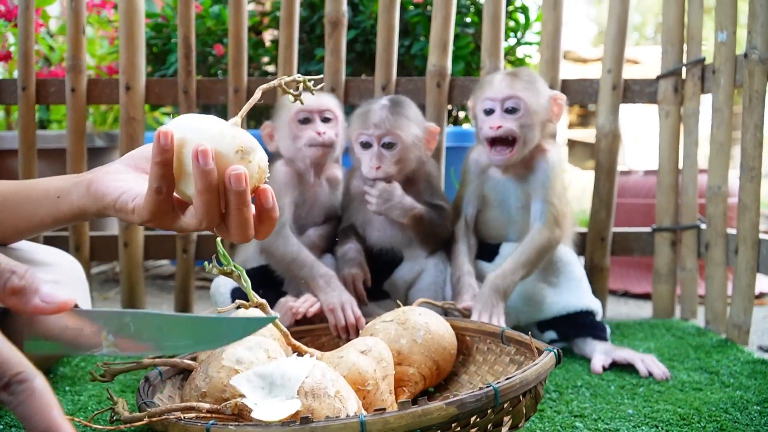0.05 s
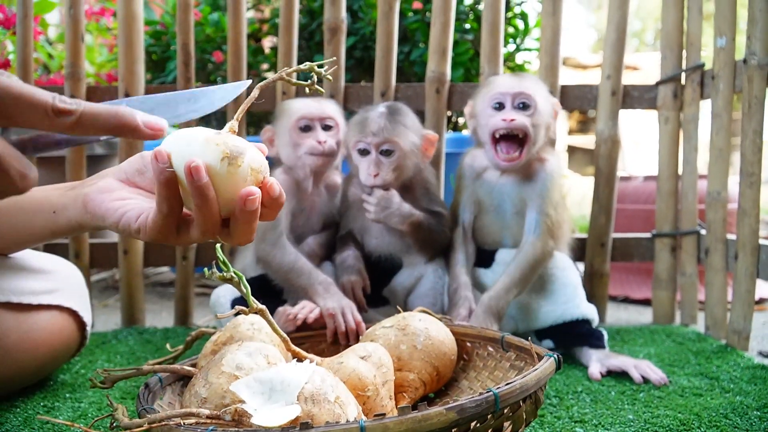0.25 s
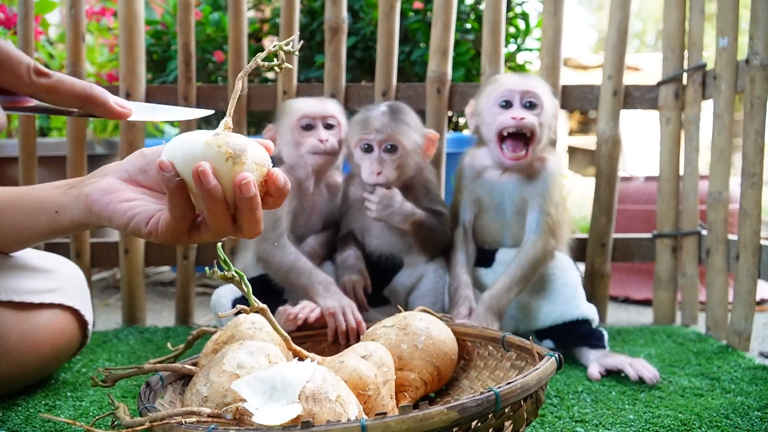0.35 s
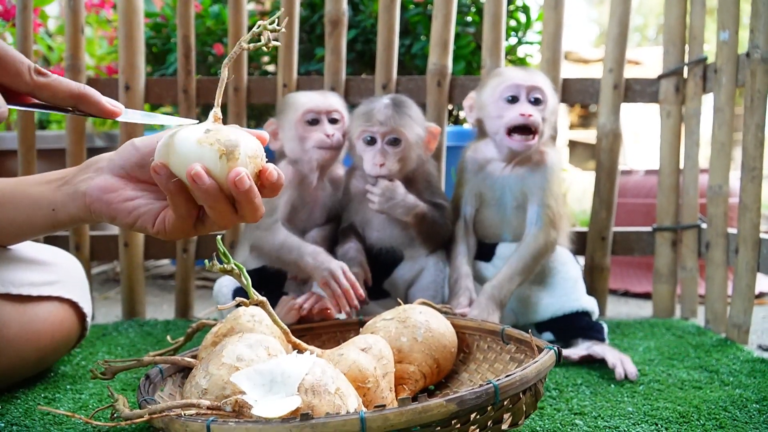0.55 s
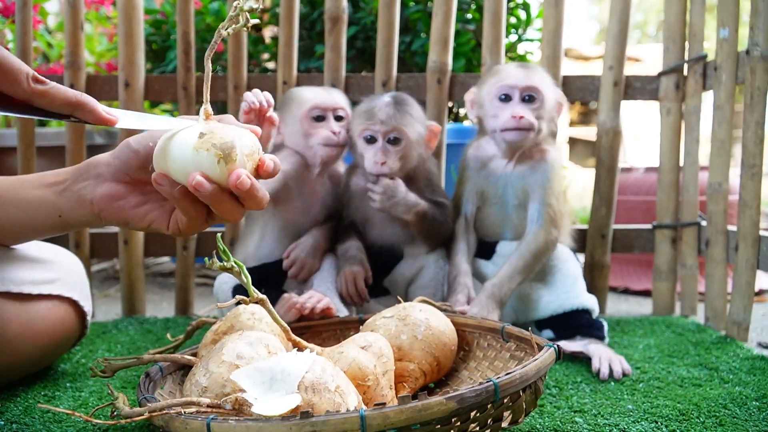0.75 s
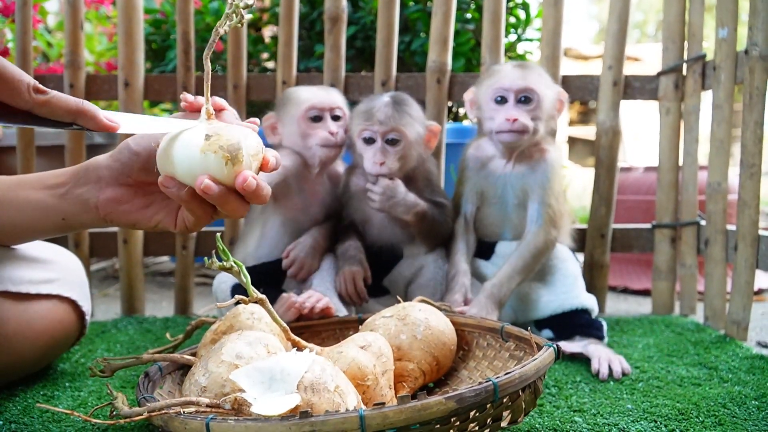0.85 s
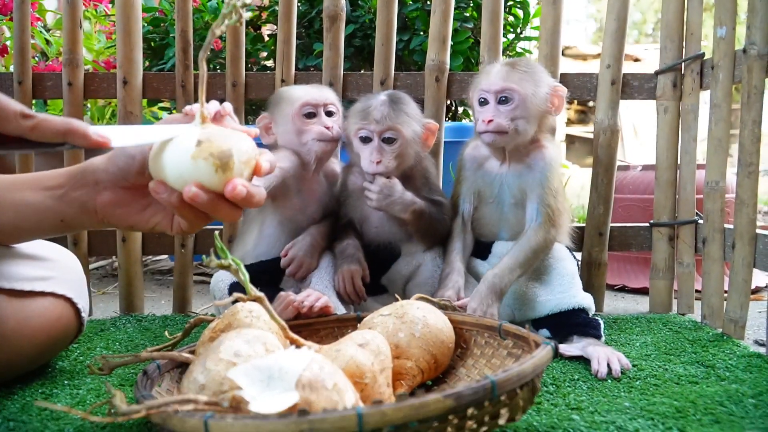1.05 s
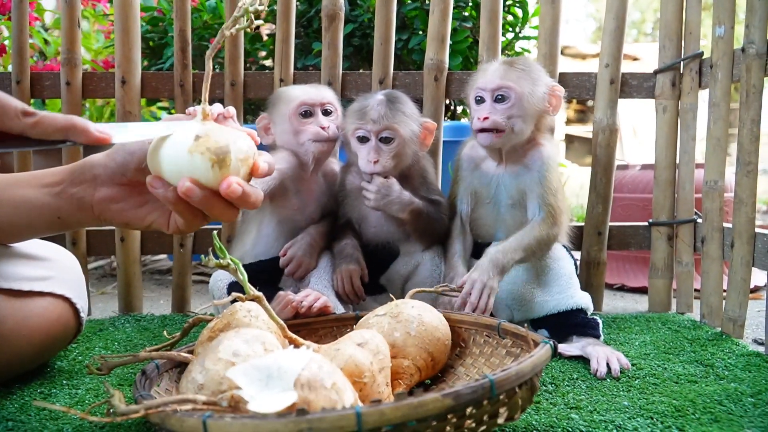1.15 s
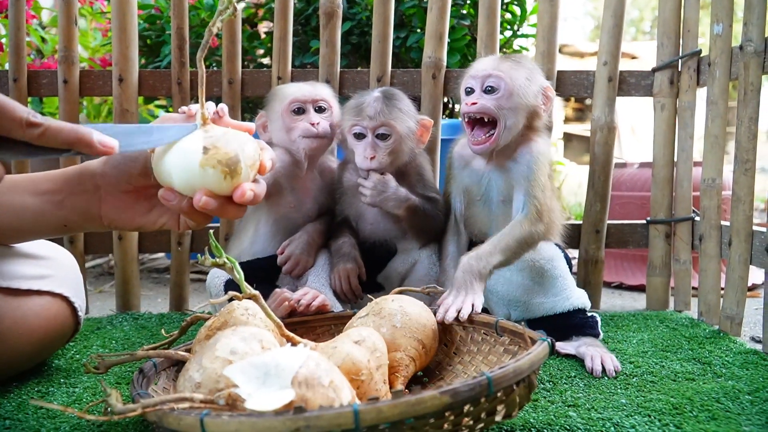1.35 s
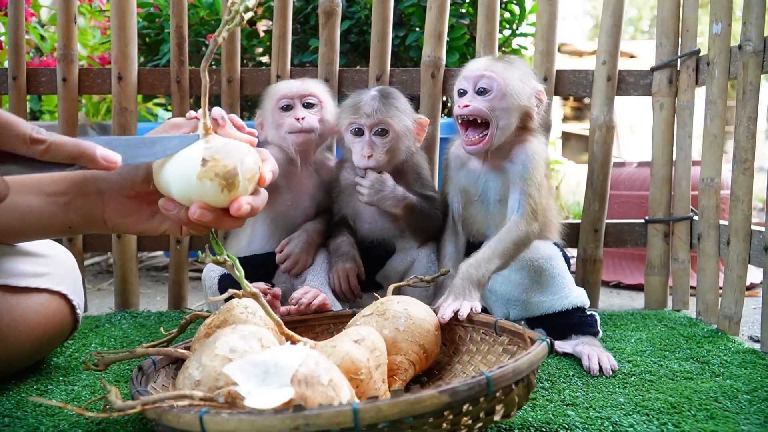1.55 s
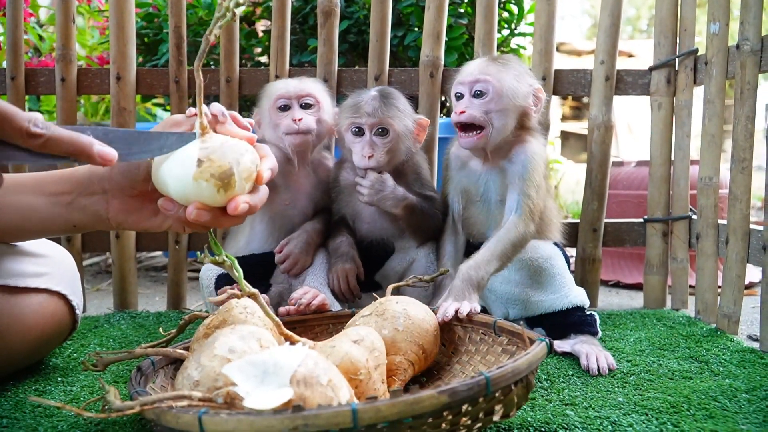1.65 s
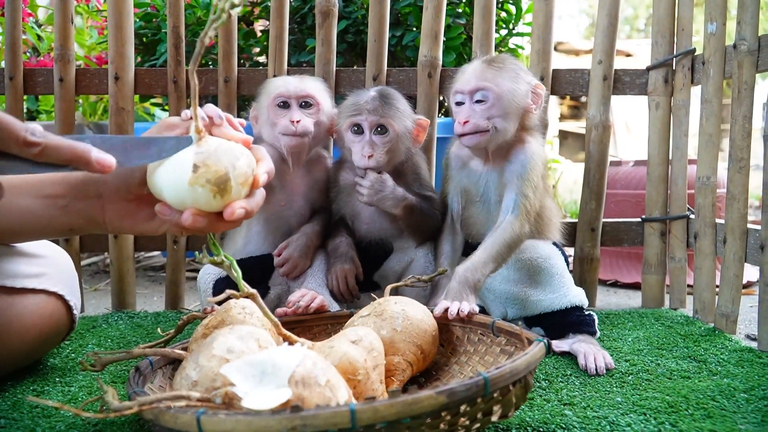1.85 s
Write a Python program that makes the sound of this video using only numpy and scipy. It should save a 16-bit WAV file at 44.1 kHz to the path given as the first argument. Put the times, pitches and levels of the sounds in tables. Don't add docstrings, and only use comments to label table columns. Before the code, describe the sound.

A young monkey squeals twice outdoors. The tail of an earlier squawk dies away at 0 s. From 0.15 s a thin whistle climbs very high, flutters, slides down and breaks into a rough squawk and low gulp by 0.6 s. A knife scrapes faintly near 0.9 s and ticks at 1.2 s. A second squeal runs 1.3-1.65 s, echoing briefly over soft yard hum.

```python
import sys
import numpy as np
from scipy import signal
from scipy.fft import rfft, irfft
from scipy.io import wavfile
from scipy.ndimage import uniform_filter1d

SR = 44100
rng = np.random.default_rng(int(sys.argv[2]) if len(sys.argv) > 2 else 0)


def transcribe(signal):
    frames = np.atleast_2d(signal).T
    limited = np.clip(frames, -1, 1)
    pcm = np.round(limited * 32767).astype(np.int16)
    wavfile.write(sys.argv[1], SR, pcm)


def volts_from_db(level):
    exponent = np.asarray(level, float) / 20
    return 10 ** exponent


N = 83790
T = np.arange(N) / SR

# f/Hz, density/dB per Hz
YARD_SPECTRUM = [(15, -14), (40, -5.5), (228, -5), (420, -3), (700, -14), (1050, -11.5), (1600, -14.5),
                 (2330, -21), (2560, -15), (11000, -38), (14300, -48), (22000, -52.5)]
# f/Hz, level/dB, t60/s
ECHO_BANDS = [(1220, -47.5, 0.093), (2023, -35.5, 0.54), (2789, -30.5, 0.31), (3700, -31, 0.47),
              (4818, -29, 0.45), (6198, -28.5, 0.43), (7800, -34.5, 0.42), (10000, -43, 0.16),
              (12500, -58, .16)]
# t/s, length/s, level/dB
WIND_PUFFS = [
    (0.21, 0.1, -53),
    (0.417, 0.018, -50.5),
    (1.552, 0.035, -51.5),
]
# t/s, peak level/dB
KNIFE_TICKS = [
    (0.9014, -57),
    (1.2049, -41.5),
    (1.2665, -36),
]
# t/s, length/s, level/dB
KNIFE_STROKES = [
    (0.852, 0.21, -62),
    (1.256, 0.13, -66.5),
]
# f/Hz, peak level/dB, fade/s
REMNANT_PARTIALS = [(1350, -27, 0.012), (2040, -21, .0045), (2750, -25.5, 0.007), (3510, -25, .0045),
                    (4100, -27, .0045)]
# t/s, length/s, f/Hz, level/dB
PEEP_TONES = [
    (1.302, 0.014, 5790, -59.5),
]
# t/s, length/s, f/Hz, level/dB
MOUTH_HUMS = [
    (.25, .04, 400, -54),
    (.35, .1, 290, -57),
    (1.395, .04, 420, -55),
]
# t/s, length/s, f/Hz, level/dB
GULP_TONES = [
    (0.571, 0.031, 249, -25),
    (1.643, 0.018, 265, -26.5),
]
# t/s, f/Hz, level/dB
STRAND_LINE = [(1.53, 4535, -46), (1.542, 4350, -35), (1.558, 4120, -35), (1.572, 3860, -30.5),
               (1.58, 3800, -49)]
# t/s, level/dB
SQUAWK_RASPS = [
    [(0.0, -42), (0.004, -35), (0.012, -59.5), (0.03, -53)],
    [(0.502, -45), (0.506, -20.5), (0.514, -23), (0.518, -12.5), (0.532, -12.5), (0.542, -10.5),
     (0.561, -16), (0.57, -24.5), (0.578, -57.5)],
    [(1.615, -28), (1.619, -19.5), (1.627, -13.5), (1.631, -16), (1.6325, -28), (1.634, -4.5),
     (1.6355, -23), (1.637, -15), (1.643, -34)],
]
# t/s, f/Hz, level/dB
SQUAWK_THROATS = [
    [(0.0, 1370, -45), (0.012, 1350, -80)],
    [(0.523, 1914, -23.5), (0.531, 1729, -15), (0.539, 1571, -23.5), (0.541, 1750, -33.5),
     (0.544, 1788, -18), (0.547, 1754, -21.5), (0.553, 1707, -18.5), (0.563, 1480, -32),
     (0.571, 1350, -29.5)],
    [(1.615, 1900, -28.5), (1.617, 1837, -19.5), (1.622, 1604, -16), (1.623, 1778, -52),
     (1.627, 1767, -23.5), (1.633, 1668, -27.5), (1.638, 1597, -32), (1.642, 1536, -46.5)],
]
# rasp start f/Hz, rasp end f/Hz, half lines start level/dB, end level/dB
SQUAWK_COURSES = [
    (3540, 5600, -36, -17),
    (4977, 3950, -33, -4.5),
    (4195, 3700, -9, 4.5),
]
# f/Hz, density/dB per Hz
RASP_TOP_SPECTRUM = [(2940, -29), (5000, -17.5), (5650, -11.5), (7000, -14.5), (7710, -20.5), (10200, -15),
                     (11400, -32.5), (16000, -25)]
# start t/s, end t/s, rate/Hz, chop depth (0-6), pitch wobble/Hz
FOLD_FLUTTER = [
    (.244, .275, 400, 1.8, 200),
    (.275, .296, 340, 1.3, 300),
    (.296, .329, 300, .2, 220),
    (.329, .356, 290, 1.5, 150),
    (.393, .425, 370, 1.2, 150),
    (.466, .498, 105, .25, 0),
    (.5, .52, 300, .4, 200),
    (1.393, 1.433, 370, 1.7, 200),
    (1.482, 1.505, 310, 1.3, 120),
    (1.6, 1.624, 300, .3, 100),
]
# t/s, length/s, level/dB
THROAT_GASPS = [
    (0.244, 0.038, -48),
    (0.403, 0.065, -41),
    (1.519, 0.14, -44.5),
]
# t/s, f/Hz, level/dB
FIRST_WHISTLE = [
    [(0.125, 6500, -69.5), (0.14, 6397, -56.5), (0.159, 7214, -45.5)],
    [(0.162, 7330, -35.5), (0.168, 7498, -29), (0.178, 7950, -37), (0.188, 8300, -28.5), (0.2, 8560, -20),
     (0.212, 8700, -23.5), (0.226, 8530, -25), (0.242, 8680, -26.5), (0.244, 8940, -23)],
    [(0.248, 10000, -31), (0.254, 10200, -31), (0.268, 10300, -33.5), (0.284, 10300, -21),
     (0.298, 10270, -10.5), (0.31, 10380, -9.5), (0.324, 10230, -11), (0.33, 10150, -10)],
    [(0.334, 10120, -20), (0.342, 10100, -24), (0.351, 10200, -13.5), (0.358, 10220, -7.5),
     (0.37, 10060, -8), (0.38, 9850, -7.5), (0.388, 9680, -12), (0.392, 9620, -18.5)],
    [(0.398, 9900, -12), (0.406, 10000, -17), (0.414, 9900, -17), (0.42, 9600, -11.5), (0.427, 9280, -19),
     (0.437, 8960, -11), (0.443, 8790, -9.5), (0.45, 8570, -8), (0.46, 8244, -6)],
    [(0.466, 8000, -18.5), (0.47, 7860, -16.5), (0.488, 7130, -11.5), (0.496, 6600, -15), (0.5, 6350, -21),
     (0.503, 6250, -10), (0.51, 6000, -21.5), (0.516, 5500, -25)],
]
# t/s, f/Hz, level/dB
SECOND_WHISTLE = [
    [(1.314, 7700, -76), (1.324, 8142, -32), (1.332, 8450, -21.5), (1.34, 8800, -28), (1.347, 9002, -34.5),
     (1.362, 9059, -28.5), (1.394, 9103, -27), (1.396, 9004, -37)],
    [(1.402, 9651, -25.5), (1.412, 9773, -45.5), (1.434, 10020, -10.5), (1.454, 10150, -11.5),
     (1.47, 9853, -8.5), (1.478, 9560, -12.5)],
    [(1.484, 9750, -12.5), (1.489, 9800, -20), (1.496, 9820, -19), (1.502, 9800, -18.5), (1.506, 9554, -5)],
    [(1.51, 9560, -13), (1.518, 9350, -5.5), (1.525, 9050, -12), (1.529, 8950, -9.5), (1.542, 8710, -22),
     (1.552, 8375, -9), (1.56, 8148, -23.5), (1.566, 7913, -8)],
    [(1.569, 7800, -9.5), (1.572, 7665, -9.5), (1.577, 7520, -14), (1.583, 7307, -7), (1.587, 7010, -0.5),
     (1.589, 6870, -19), (1.591, 6680, -19.5), (1.593, 6390, -19.5), (1.598, 6110, -9.5)],
    [(1.6, 6160, -21), (1.603, 5770, -15), (1.609, 5316, -27.5), (1.614, 4808, -12.5), (1.618, 4136, -31.5),
     (1.624, 2965, -25)],
]
MIRROR_LEVELS_DB = [-19, -33.5, -41.5]


def column(rows, index, outside):
    rows = np.array(rows)
    return np.interp(T, rows[:, 0], rows[:, index], left=outside, right=outside)


def rms_one(x):
    return x / np.sqrt(np.mean(np.abs(x) ** 2) + 1e-20)


def low(x, hz, order=2):
    return signal.sosfilt(signal.butter(order, np.clip(hz, 5, 20000), fs=SR, output="sos"), x)


def band(x, low_hz, high_hz):
    return signal.sosfilt(signal.butter(2, [low_hz, min(high_hz, 20000)], "band", fs=SR, output="sos"), x)


def drift(hz):
    return rms_one(low(rng.standard_normal(N), hz))


def bump(start_s, length_s):
    return np.sin(np.pi * np.clip((T - start_s) / length_s, 0, 1)) ** 2


def swells(events):
    return sum(volts_from_db(db) * bump(s, length_s) for s, length_s, db in events)


def turns(hz):
    return 2 * np.pi * np.cumsum(hz) / SR


def coloured(points):
    hz, db = np.transpose(points)
    f = np.fft.rfftfreq(N, 1 / SR) + 1
    gain = volts_from_db(np.interp(np.log(f), np.log(hz), db))
    return rms_one(irfft(rfft(rng.standard_normal(N)) * gain, N))


def yard():
    return volts_from_db(-61 + 0.6 * drift(14)) * coloured(YARD_SPECTRUM)


def wind():
    return drift(100) * swells(WIND_PUFFS)


def echo(x):
    smear_hz, onset_s = 350, 0.0094
    earlier_db, earlier_top_hz = 16, 8300
    white = rng.standard_normal((2, N))
    tail = 0
    for k, (hz, db, t60_s) in enumerate(ECHO_BANDS):
        fade = volts_from_db(db - 45 - 60 * T / t60_s)
        tail = tail + fade * rms_one(band(white[k % 2], hz / 1.273, hz * 1.296))
    tail = tail * np.clip(T / onset_s, 0, 1)
    returns = signal.fftconvolve(x * drift(smear_hz), tail)[:N]
    earlier = low(tail - 0.62 * band(tail, 5000, 6700), earlier_top_hz, order=6)
    return returns + volts_from_db(earlier_db) * earlier


def knife():
    tick_hz, tick_width_hz = 2873, 4800
    stroke_low_hz, stroke_high_hz = 3396, 5000
    grains = rng.standard_normal(N) * volts_from_db(2.3 * drift(136))
    grit = rms_one(band(grains, stroke_low_hz, stroke_high_hz))
    strokes = grit * sum(volts_from_db(db) * bump(s, length_s) ** .5 for s, length_s, db in KNIFE_STROKES)
    clicks = np.zeros(N)
    for s, db in KNIFE_TICKS:
        clicks[int(s * SR)] = 3 * volts_from_db(db)
    ticks = band(clicks, max(tick_hz - tick_width_hz / 2, 200), tick_hz + tick_width_hz / 2)
    return low(ticks, 6100, order=4) + strokes


def remnant():
    out = 0
    for k, (hz, db, fade_s) in enumerate(REMNANT_PARTIALS):
        out = out + (-1) ** k * volts_from_db(db) * np.exp(-(T / fade_s) ** 2) * np.sin(2 * np.pi * hz * T)
    return out


def peeps_and_hums():
    return sum(volts_from_db(db) * bump(s, length_s) * np.sin(2 * np.pi * hz * T)
               for s, length_s, hz, db in PEEP_TONES + MOUTH_HUMS)


def gulps():
    sag, t60_s, husk = 0.2, 0.077, 0.24
    overtone_ratio, overtone_db = 1.7, -6
    out = 0
    for s, length_s, hz, db in GULP_TONES:
        phase = turns(hz * (1 - sag * np.clip((T - s) / length_s - .5, -1, 1)))
        fade = volts_from_db(db - 60 * np.clip(T - s, 0, 1) / t60_s) * np.sqrt(bump(s, length_s))
        tone = np.sin(phase) + volts_from_db(overtone_db) * np.sin(overtone_ratio * phase)
        out = out + band(fade * (1 + husk * drift(120)) * tone, 150, 800)
    return out


def strand():
    husk = 1 + 0.35 * drift(146.8)
    tone = np.sin(turns(column(STRAND_LINE, index=1, outside=2800)))
    return volts_from_db(column(STRAND_LINE, index=2, outside=-150)) * husk * tone


def rasp_push():
    pulses_hz, width_hz, noise = 480, 480, 0.77
    cycle = turns(pulses_hz * (1 + .3 * drift(200))) // (2 * np.pi)
    slaps = (np.diff(cycle, prepend=0) > 0) * volts_from_db(2.6 * rng.standard_normal(N))
    pulses = rms_one(slaps) * np.exp(2j * np.pi * rng.random((2, N)))
    hiss = rng.standard_normal((2, N)) + 1j * rng.standard_normal((2, N))
    return rms_one(low(pulses + noise * hiss, width_hz, order=4))


def squawks():
    top_db, top_fade_db = -7, 18.5
    lower_ratio, lower_from_db, lower_to_db = 0.74, -10, 5
    harmonics_db = [0, 3.5, -3.5, -11.5]
    floor_hz, chest_db = 970, -23
    upper, lower = rasp_push()
    top = volts_from_db(top_db) * coloured(RASP_TOP_SPECTRUM) * (np.abs(upper) + .5)
    out = 0
    for rows, voice, course in zip(SQUAWK_RASPS, SQUAWK_THROATS, SQUAWK_COURSES):
        from_hz, to_hz, half_from_db, half_to_db = course
        along = np.clip((T - rows[0][0]) / (rows[-1][0] - rows[0][0]), 0, 1)
        centre = turns(from_hz + (to_hz - from_hz) * along)
        share = volts_from_db(lower_from_db + (lower_to_db - lower_from_db) * along)
        rings = upper * np.exp(1j * centre) + share * lower * np.exp(1j * lower_ratio * centre)
        rasp = np.real(rings) + volts_from_db(-top_fade_db * along) * top
        throat = turns(column(voice, index=1, outside=1400) + 70 * along * drift(400))
        tone = sum(volts_from_db(db) * np.sin(k * throat) for k, db in enumerate(harmonics_db, 1))
        half_gain = volts_from_db(half_from_db + (half_to_db - half_from_db) * along)
        halves = half_gain * (np.sin(3 * throat / 2) + np.sin(5 * throat / 2))
        rough = volts_from_db(7 * along * drift(200))
        out = out + volts_from_db(column(rows, index=1, outside=-150)) * rasp
        out = out + volts_from_db(column(voice, index=2, outside=-150)) * rough * (tone + halves)
    chest = band(np.abs(out) * rng.standard_normal(N), 290, 770)
    floor = signal.butter(6, floor_hz, "high", fs=SR, output="sos")
    return signal.sosfilt(floor, out) + volts_from_db(chest_db) * chest


def flutter():
    rate_jitter, flap_spread_db = 0.14, -0.5
    rate_hz, chop, wobble_hz = np.full(N, 300.), np.zeros(N), np.zeros(N)
    for start_s, end_s, hz, depth, swing_hz in FOLD_FLUTTER:
        on = (T >= start_s) & (T < end_s)
        rate_hz[on], chop[on], wobble_hz[on] = hz, depth, swing_hz
    chop = uniform_filter1d(chop, size=260)
    wobble_hz = uniform_filter1d(wobble_hz, size=260)
    phase = turns(rate_hz * (1 + rate_jitter * drift(150)))
    skew = phase - np.cos(phase) / 4
    spread = volts_from_db(flap_spread_db * np.minimum(chop, 1) * drift(150))
    gain = np.exp(chop * (np.cos(skew) - 1)) * spread
    gain = gain / np.sqrt(uniform_filter1d(gain ** 2, size=400))
    return gain, -wobble_hz * np.sin(phase), chop


def flap_snaps(chop):
    out = 0
    for hz, db in ((8720, -10), (11900, -21.5)):
        out = out + volts_from_db(db) * np.sin(turns(hz + 280 * drift(450)))
    return out * np.clip(2 * chop - .9, 0, 1)


def throat_hiss(level_db):
    breath = volts_from_db(0.5 * drift(15)) * rms_one(band(rng.standard_normal(N), 3336, 4700))
    return (volts_from_db(-50 + 0.38 * level_db) + swells(THROAT_GASPS)) * breath


def whistle():
    pitch_jitter_hz, octave_db, air_db, air_width_hz = 22, -16.5, -39, 1400
    loudest = 0.48
    rows = [row for phrase in FIRST_WHISTLE for row in phrase]
    rows += [(.525, 5000, -63), (.54, 5000, -120), (1.31, 7600, -120)]
    rows += [row for phrase in SECOND_WHISTLE for row in phrase]
    rows += [(1.628, 2980, -65)]
    gain, swing_hz, chop = flutter()
    level_db = column(rows, index=2, outside=-250)
    phase = turns(column(rows, index=1, outside=3800) + swing_hz + pitch_jitter_hz * drift(450))
    tone = (1 + volts_from_db(air_db) * drift(air_width_hz)) * np.sin(phase)
    tone = tone + volts_from_db(air_db) * drift(air_width_hz) * np.cos(phase)
    tone = tone + volts_from_db(octave_db) * np.sin(2 * phase)
    loudness = np.minimum(volts_from_db(level_db) * gain, loudest)
    return loudness * (np.sqrt(2) * tone + flap_snaps(chop)) + throat_hiss(level_db)


def scene():
    monkey = remnant() + peeps_and_hums() + gulps() + strand() + squawks() + whistle()
    return (yard() + wind() + knife() + volts_from_db(12) * echo(monkey) + monkey)[None]


def top_cut(x):
    return signal.sosfilt(signal.butter(12, 16430, fs=SR, output="sos"), x)


def record(dry):
    mirror_step_hz, mirror_top_hz, clip_level, cut_hz = 3900, 10000, 0.9, 16550
    edge = np.zeros((1, 2))
    bend = np.diff(dry, n=4, axis=1, prepend=edge, append=edge) / 4
    comb = sum(2 * volts_from_db(db) * np.cos(2 * np.pi * k * mirror_step_hz * T)
               for k, db in enumerate(MIRROR_LEVELS_DB, 1))
    mirrored = dry + low(comb * bend, mirror_top_hz, order=1)
    clipped = np.clip(mirrored, -clip_level, clip_level)
    mix = signal.sosfilt(signal.cheby2(12, 70, cut_hz, fs=SR, output="sos"), clipped)
    return top_cut(mix)


dry = scene()
out = record(dry)
transcribe(out)
```